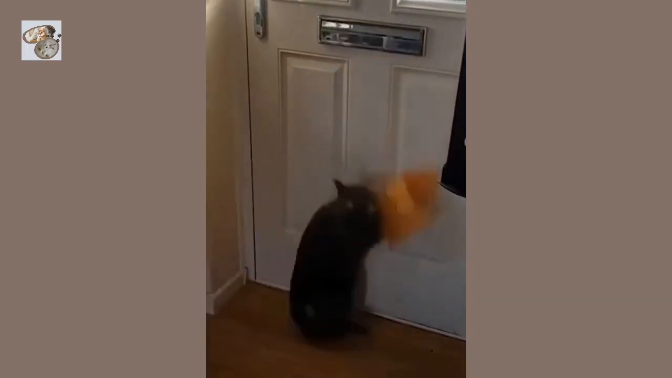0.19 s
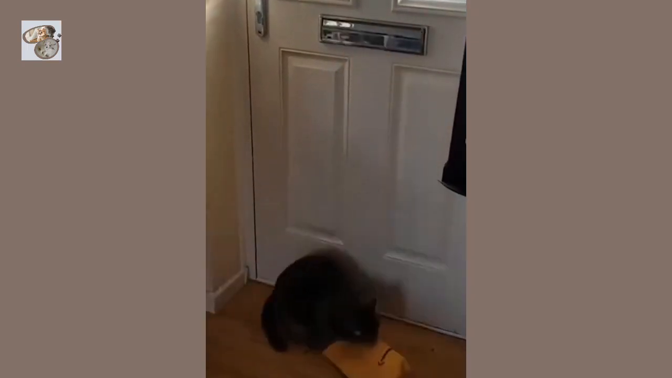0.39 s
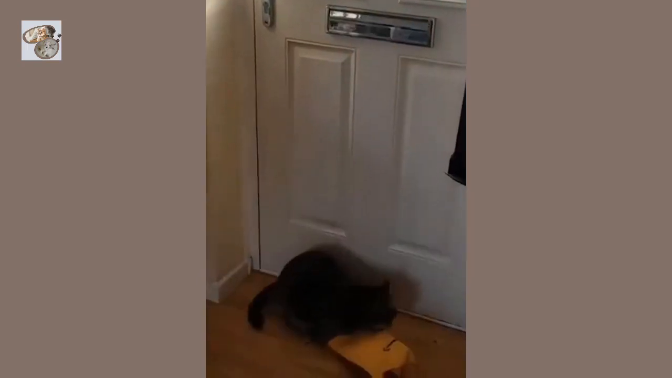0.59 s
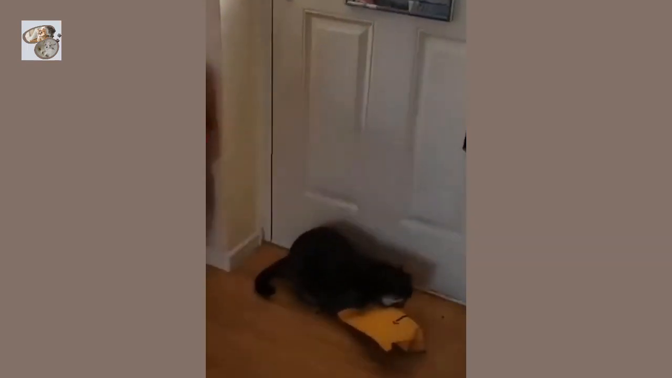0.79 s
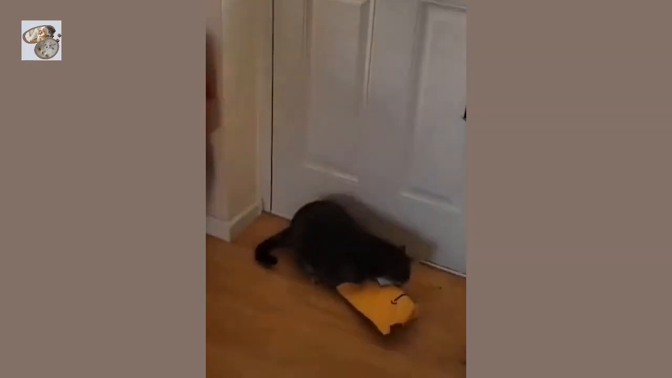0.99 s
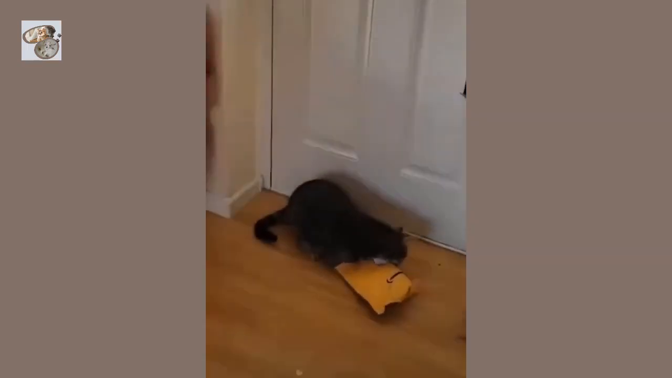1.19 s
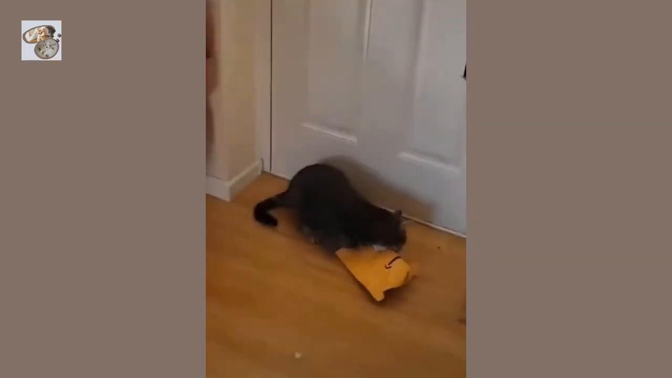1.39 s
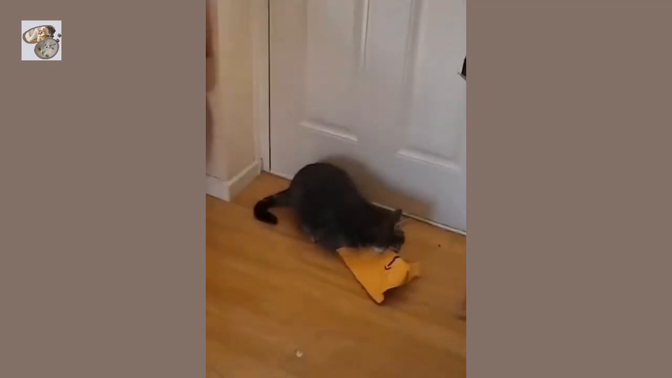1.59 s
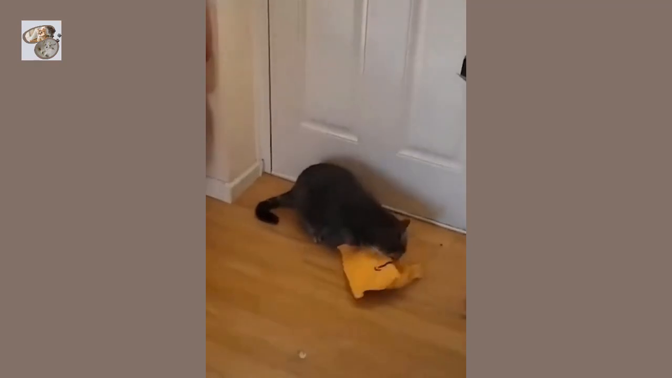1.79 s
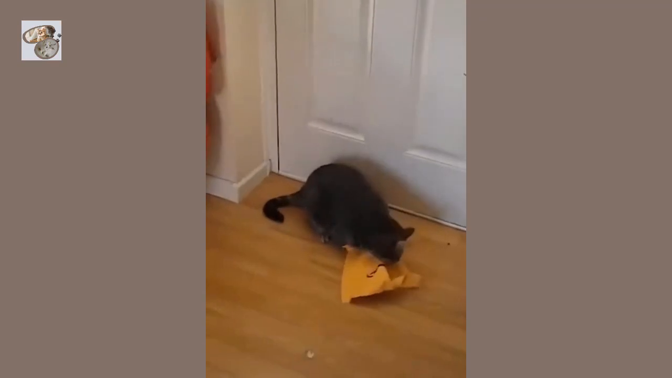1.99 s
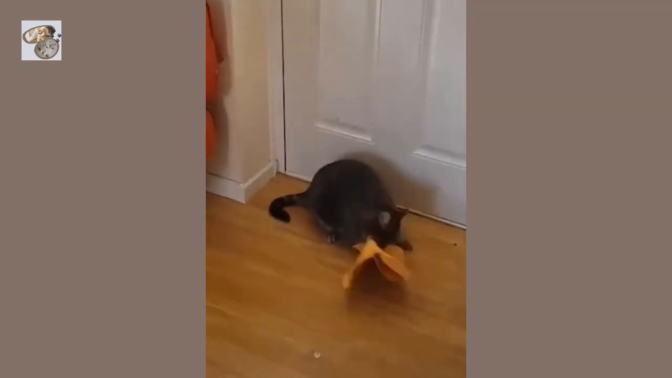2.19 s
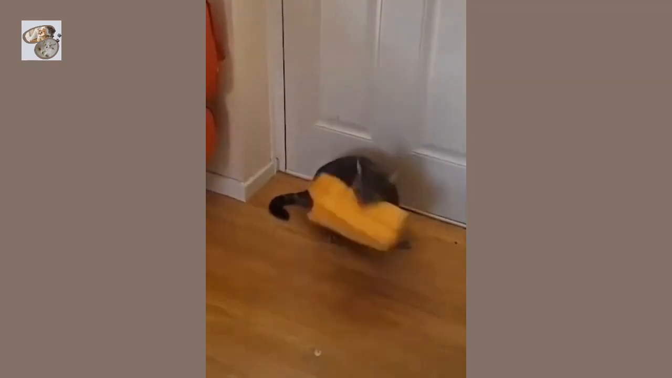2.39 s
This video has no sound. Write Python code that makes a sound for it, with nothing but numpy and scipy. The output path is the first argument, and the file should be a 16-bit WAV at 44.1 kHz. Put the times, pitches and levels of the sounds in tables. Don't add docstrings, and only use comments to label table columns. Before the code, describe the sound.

Padded envelope scrapes from a ringing metal flap, drops with thuds and slaps, then rustles faintly

```python
import sys
import numpy as np
from scipy import signal
from scipy.fft import rfft, irfft
from scipy.io import wavfile
from scipy.ndimage import uniform_filter1d

SR = 44100
rng = np.random.default_rng(int(sys.argv[2]) if len(sys.argv) > 2 else 0)


def file_out(sig):
    cols = np.atleast_2d(sig).T
    lim = np.clip(cols, -1, 1)
    pcm = np.round(lim * 32767).astype(np.int16)
    wavfile.write(sys.argv[1], SR, pcm)


def how_loud(loudness_db):
    steps = np.asarray(loudness_db, float) / 20
    return 10 ** steps


N = 105840

# (frequency [Hz], level [dB])
AIR_COLOUR = [(12, -54), (20, 2.5), (161, -1), (346, -23), (4550, -16.5), (5820, -13.5), (7250, -29),
              (12900, -27.5), (14000, -50)]
AIR_DB = -60

# (frequency [Hz], t60 [s])
HALL_DECAY = [(150, 0.4), (400, 0.37), (1040, 0.4), (2760, 0.48), (7280, 0.32), (12000, 0.27)]
THUD_HALL_DB, LOUD_HALL_DB, PAPER_HALL_DB, CREASE_HALL_DB = -8, -2, -4, -9

# (frequency [Hz], side level [dB])
STEREO_WIDTH = [(100, -34.5), (210, -17.5), (330, -7), (680, -6.5), (1240, 0), (2270, -3.5), (9000, -2),
                (12000, -1)]
LEAN = -0.08
DIP_HZ, DIP_WIDTH_HZ, DIP_DB, EDGE_HZ = 8150, 450, -10, 12950

# (time [s], peak level [dB],
# pitch [Hz], length [cycles])
THUDS = [(0.246, -35, 61, 2.6), (.283, -23, 230, 3.4), (.302, -20.5, 74.6, 1.3), (.347, -26.5, 67.6, 1.5),
         (.375, -34, 62, 4.6), (.432, -16.5, 155, 1.6), (.448, -11, 210, 3.3), (0.46, -15.5, 66, 1.64),
         (.467, -8.5, 200, 2.58), (.478, -24, 87, 4.7), (.49, -21.5, 153, 6), (.505, -20.5, 236, 1.9),
         (0.521, -35, 61, 11), (.521, -23.5, 140, 1.6), (.541, -26.5, 145, 1.6), (.57, -35.5, 95, 3),
         (.704, -25, 243, 1.45), (.712, -26, 310, 1.9), (.72, -47.5, 58, 6.8), (.7405, -12.5, 484, 0.81),
         (1.1745, -36, 580, 3.5), (1.2955, -43, 610, 3.5), (1.59, -56, 70, 2.3), (1.683, -34, 259, 2),
         (1.685, -38, 730, 1.8), (1.888, -28, 293, 1.57), (2.092, -45.5, 139, 0.75), (2.26, -40.5, 930, 5)]
# (frequency [Hz], level [dB], t60 [s])
BOARDS = [(65, -20.5, 0.16), (160, -14, 0.21), (210, -9, 0.13), (338, -31, .25), (768, 6, 0.062)]
BOARDS_DB = -21

# (time [s], pitch [Hz], level [dB])
GROWL = [
    (1.42, 229.8, -89),
    (1.5, 225, -59),
    (1.58, 171.7, -56.5),
    (1.66, 212.3, -63),
    (1.78, 181.8, -71),
    (1.86, 169.2, -48.5),
    (2.0, 180.5, -61.5),
    (2.15, 168.3, -72),
]

# (time [s], peak level [dB], lowest [Hz], highest [Hz])
TICKS = [
    (.7402, -12, 400, 5000),
    (.7695, -19, 1500, 4500),
    (1.3605, -26, 500, 4000),
    (1.4855, -26, 1400, 15000),
    (1.5055, -34, 2500, 15000),
    (1.6138, -26, 4100, 15000),
    (1.6852, -31, 300, 2500),
    (1.8425, -33, 800, 4000),
]

# (time [s], peak level [dB], pitch [Hz], length [s])
CREASES = [(0.159, -50, 5340, 0.0036), (.173, -41, 4300, 0.0053), (0.1736, -38, 5870, 0.0054),
           (0.176, -48, 1250, 0.0058), (0.183, -42, 904, 0.0092), (.2105, -30.5, 4640, 0.015),
           (.213, -27.5, 2550, 0.013), (0.222, -26.5, 4220, .007), (0.23, -27, 893, 0.0091),
           (0.241, -26, 1294, 0.012), (0.269, -36, 3007, .018), (0.277, -38, 1443, 0.013),
           (0.3188, -25, 1476, 0.01), (0.351, -30, 1300, 0.0065), (0.439, -23.5, 710.4, 0.021),
           (0.461, -29, 718, 0.018), (.465, -30, 900, 0.012), (.469, -23.5, 1211, 0.014),
           (.47, -27, 1999, .016), (.472, -21.5, 342, 0.016), (.505, -36, 602, 0.034),
           (.51, -33.5, 1128, 0.015), (0.736, -30.5, 4840, 0.021), (0.738, -22, 3386, .007),
           (0.749, -30.5, 5990, 0.016), (.764, -28, 2230, 0.013), (0.781, -31.5, 2813, 0.019),
           (1.171, -46.5, 2670, 0.0025), (1.205, -43, 3225, 0.011), (1.206, -40.5, 2007, 0.0075),
           (1.289, -41, 4060, .005), (1.336, -47.5, 746, 0.0093), (1.36, -39, 1390, 0.0031),
           (1.369, -42, 1006, .008), (1.391, -44.5, 1010, 0.0044), (1.69, -49, 753, 0.039),
           (1.716, -48.5, 480, 0.033), (2.223, -44.5, 2826, .015), (2.245, -49.5, 3940, .01),
           (2.261, -44, 1826, 0.0051), (2.268, -41, 962, 0.011), (2.341, -47, 3910, 0.013)]
CREASE_ROUGHNESS = 0.8
# (time [s], length [s], level [dB], from [Hz], to [Hz])
SQUEEZES = [
    (.24, .06, -36, 1505, 4283),
    (0.319, .045, -29, 1506, 3196),
]
SQUEEZE_WIDTH_HZ = 500

# (time [s], level [dB], t60 [s], dullness [dB per octave], plastic sheen [dB])
SLAPS = [(0.174, -35, 0.073, -15, -13), (0.188, -27.5, 0.06, -8, 4.5), (.436, -21, 0.28, 4.5, 11),
         (.442, -21, 0.084, 1.5, 27.5), (0.455, -20.5, 0.091, -25.5, -11), (.47, -21.5, 0.068, 4.5, 0),
         (.54, -39.5, 0.16, -12, -21), (0.7331, -29, 0.071, 2.5, 7), (.74, -21, 0.12, -0.5, 2.5),
         (.757, -27.5, 0.16, 8, 17), (1.166, -46, 0.17, -3, 3.5), (1.205, -36.5, 0.043, 0.5, -20),
         (1.292, -45.5, 0.2, -15, -10), (1.36, -34.5, 0.055, 3.5, -12), (1.685, -35.5, 0.048, 6.5, 5),
         (1.69, -39.5, 0.031, -4.5, -9), (1.841, -35.5, 0.065, 2.5, -8), (1.891, -30, 0.052, 2, -1),
         (2.258, -37, 0.083, 4.5, 0)]
# (frequency [Hz], level [dB])
SLAP_COLOUR = [(150, -27), (250, -9), (978, -8.5), (4930, -7), (5450, -10), (5930, -9.5), (8310, -24.5),
               (12400, -26), (14000, -45)]
SLAP_RISE_S, SHEEN_HZ = 0.0015, 8290

# (time of top [s], level [dB], rise and fall [s], dullness [dB per octave], plastic sheen [dB])
RUSTLES = [(0.654, -47, 0.09, -2.5, -0.5), (0.949, -55, 0.11, 8, 15), (1.058, -55, 0.013, -8.5, -5.5),
           (1.238, -44.5, 0.031, -1.5, -1), (1.291, -46.5, 0.01, 0.5, 8), (1.338, -52, 0.033, 4, 14),
           (1.387, -48.5, 0.036, 1, 2), (1.497, -50, 0.025, 1, 4), (1.572, -55, 0.086, 2, 10.5),
           (1.74, -54.5, 0.04, 4, 2), (1.818, -49.5, 0.039, -3, -7), (1.873, -42.5, 0.018, 1, -3),
           (1.94, -53.5, 0.049, 10, 32), (2.09, -50, 0.035, -4.5, -6.5), (2.162, -49.5, 0.035, -5.5, -5),
           (2.231, -43, 0.03, -1.5, 5), (2.276, -45, 0.027, 2.5, 11.5), (2.348, -40.5, 0.037, -4, 1.5),
           (2.4, -65, 0.022, -6, 0)]
# (frequency [Hz], level [dB])
PAPER_COLOUR = [(180, -22.5), (300, -11), (986, -5), (1320, -3), (4470, -2), (8100, -19), (12500, -20),
                (13300, -25), (14000, -76)]

# (time [s], force [dB])
PULL = [
    (.155, -62.5),
    (.18, -50),
    (.205, -31.5),
    (.217, -29.5),
    (.25, -29.5),
    (.3, -32),
    (.355, -35.5),
    (.368, -46),
    (.43, -32.5),
]
# (frequency [Hz], level [dB])
PULL_COLOUR = [(150, -40), (250, -19), (394, -21.5), (841, -15), (1010, -18), (4380, -16), (8310, -25),
               (12200, -25), (14000, -43)]
# (frequency [Hz], bandwidth [Hz], level [dB])
FLAP = [(860, 45, 3), (1220, 110, -7), (2980, 140, -9), (4420, 60, -9)]
FLAP_DB, FLAP_S, FLAP_SPAN_S = 2, 0.245, 0.04
RATTLE_HZ, RATTLE_DB = 75, -16


def evened(x):
    return x / np.sqrt(np.mean(x ** 2) + 1e-20)


def read(points, hz):
    f, value = np.transpose(points)
    return np.interp(np.log(hz + 1), np.log(f + 1), value)


def curve(rows, col=1):
    rows = np.array(rows)
    return np.interp(np.arange(N) / SR, rows[:, 0], rows[:, col])


def add(mix, s, sound):
    part = mix[round(s * SR):][:len(sound)]
    part += sound[:len(part)]


def colour(x, points, slope_db=0., sheen_db=0.):
    hz = np.fft.rfftfreq(len(x) if x.ndim == 1 else len(x), 1 / SR)
    shelf = sheen_db * np.clip((hz - SHEEN_HZ) / 1000 + 0.5, 0, 1)
    tilt = slope_db * np.log2(hz / 2000 + 0.15)
    return irfft(rfft(x) * how_loud(read(points, hz) - tilt + shelf), len(x))


def ring(x, hz, width):
    r = np.exp(-np.pi * width / SR)
    return 2 * signal.lfilter([1 - r], [1, -r * np.exp(2j * np.pi * hz / SR)], x).real


def crackle(per_s, spread_db, clump_db):
    out, t = np.zeros(N), np.arange(256) / SR
    for hz in np.geomspace(300, 14000, num=12):
        clumps = uniform_filter1d(rng.standard_normal(N), size=400)
        clumps = evened(uniform_filter1d(clumps, size=400))
        size_db = spread_db * np.minimum(rng.exponential(1, N), 3) + clump_db * clumps
        size = how_loud(size_db) * rng.standard_normal(N)
        hits = size * (rng.random(N) < per_s / SR)
        snap = np.sin(2 * np.pi * hz * t) * np.exp(-t * hz * 2.08)
        out += signal.oaconvolve(hits, snap * np.sqrt(hz) / np.linalg.norm(snap))[:N]
    return evened(out)


def air():
    noise = rng.standard_normal((2, N))
    return how_loud(AIR_DB) * evened(np.array([colour(v, AIR_COLOUR) for v in noise]))


def hall(x):
    taps = np.zeros((3, 2, SR))
    at = np.arange(120, SR - 20, 20) + rng.integers(0, 20, (3, 2, (SR - 121) // 20))
    np.put_along_axis(taps, at, rng.choice([-1., 1.], at.shape), 2)
    hz, t, z = signal.stft(taps, SR, nperseg=256)
    t60 = np.maximum(read(HALL_DECAY, hz), 0.05)[:, None]
    tail = signal.istft(z * how_loud(-60 * t / t60), SR, nperseg=256)[1]
    phase = np.arange(N) / SR * 7 + np.arange(3)[:, None, None] / 3
    turns = np.sqrt(2 / 3) * np.cos(2 * np.pi * phase)
    return signal.fftconvolve(x * turns, tail / np.linalg.norm(tail[0, 0]), axes=2)[..., :N].sum(0)


def thuds():
    blows = np.zeros(N)
    for s, db, hz, cycles in THUDS:
        u = np.arange(0, 1.5 * cycles, hz / SR)
        swell = np.e * 3 * u / cycles * np.exp(-3 * u / cycles)
        add(blows, s, how_loud(db) * np.sin(2 * np.pi * u) * swell)
    boards = sum(how_loud(db) * ring(blows, hz, 2.9 / t60) * 8 for hz, db, t60 in BOARDS)
    return blows + how_loud(BOARDS_DB) * boards


def growl():
    wobble = evened(uniform_filter1d(rng.standard_normal((2, N)), size=700))
    turns = np.cumsum(curve(GROWL) * (1 + 0.08 * wobble[0])) / SR
    tone = np.sin(2 * np.pi * turns) + 0.69 * np.sin(4 * np.pi * turns * 0.8)
    return evened(tone) * how_loud(curve(GROWL, col=2) + 1.7 * wobble[1])


def ticks():
    out, t = np.zeros(N), np.arange(400) / SR
    for (s, db, low_hz, top_hz), noise in zip(TICKS, rng.standard_normal((len(TICKS), 400))):
        high_pass = signal.butter(4, low_hz, "high", fs=SR, output="sos")
        low_pass = signal.butter(2, top_hz, fs=SR, output="sos")
        click = signal.sosfilt(high_pass, noise * how_loud(-60 * t / 0.006))
        click = signal.sosfilt(low_pass, 0.15 * click + ring(click, 3500, 4000))
        add(out, s, how_loud(db) * click / np.abs(click).max())
    return out


def creases():
    out = np.zeros(N)
    for (s, db, hz, length), noise in zip(CREASES, rng.standard_normal((len(CREASES), 2, 8192))):
        u = np.arange(8192) / SR / length
        flutter = 1 + CREASE_ROUGHNESS * evened(uniform_filter1d(noise, size=90))
        turn = 2 * np.pi * hz * length * u
        tone = flutter[0] * np.sin(turn) + (flutter[1] - 1) * np.cos(turn)
        add(out, s, how_loud(db) * tone * np.e * 3 * u * np.exp(-3 * u))
    return out


def squeezes():
    out = np.zeros(N)
    for s, length, db, from_hz, to_hz in SQUEEZES:
        u = np.arange(0, 1, 1 / (length * SR))
        turn = np.exp(2j * np.pi * np.cumsum(from_hz * (to_hz / from_hz) ** u) / SR)
        real, imag = [ring(v, 0, SQUEEZE_WIDTH_HZ)[:len(u)] for v in rng.standard_normal((2, 8192))]
        hiss = evened((turn * (real + 1j * imag)).real)
        add(out, s, how_loud(db) * hiss * np.sqrt(np.sin(np.pi * u)))
    return out


def slaps():
    out, t = np.zeros(N), np.arange(8192) / SR
    for (s, db, t60, slope_db, sheen_db), noise in zip(SLAPS, rng.standard_normal((len(SLAPS), 2, 8192))):
        grains = noise[0] * (5.1 + np.abs(noise[1]))
        grains = evened(colour(grains, SLAP_COLOUR, slope_db, sheen_db))
        add(out, s, grains * np.minimum(t / SLAP_RISE_S, 1) * how_loud(db - 60 * t / t60))
    return out


def worry():
    snaps, t = crackle(3500, spread_db=1.0, clump_db=0.4), np.arange(N) / SR
    out = np.zeros(N)
    for s, db, span, slope_db, sheen_db in RUSTLES:
        rustle = evened(colour(snaps, PAPER_COLOUR, slope_db, sheen_db))
        out += rustle * how_loud(db) * np.exp(-((t - s) / span) ** 2)
    return out


def pull():
    t = np.arange(N) / SR
    force = how_loud(curve(PULL)) * (t > PULL[0][0]) * (t < PULL[-1][0])
    slips = evened(colour(crackle(3000, spread_db=3.5, clump_db=6.0), PULL_COLOUR))
    contact = 0.27 + np.exp(-((t - FLAP_S) / FLAP_SPAN_S) ** 2)
    scrape = rng.standard_normal(N) * force * contact
    metal = sum(how_loud(db) * ring(scrape, hz, width) * np.sqrt(1000 / width) for hz, width, db in FLAP)
    door = evened(ring(ring(rng.standard_normal(N), RATTLE_HZ, 85), RATTLE_HZ, 84))
    return force * (slips + how_loud(RATTLE_DB) * door) + how_loud(FLAP_DB) * metal


def scene():
    low, near = thuds() + growl(), ticks()
    loud, paper, pops = pull() + slaps(), worry(), creases() + squeezes()
    bright = loud + paper + pops
    to_hall = how_loud(THUD_HALL_DB) * low + how_loud(LOUD_HALL_DB) * loud
    to_hall += how_loud(PAPER_HALL_DB) * paper + how_loud(CREASE_HALL_DB) * pops
    mid, side = hall(to_hall) + air()
    mid = mid + low + 0.8 * bright + near
    late = np.roll(0.14 * bright + 0.15 * near, 9)
    side = colour(side + late + LEAN * mid, STEREO_WIDTH) * how_loud(3.0)
    return np.array([mid + side, mid - side])


def roll_off(x):
    return signal.sosfilt(signal.butter(12, 14540, fs=SR, output="sos"), x)


def record(dry):
    hz = np.fft.rfftfreq(N, 1 / SR)
    dip_db = DIP_DB * np.exp(-((hz - DIP_HZ) / DIP_WIDTH_HZ) ** 2)
    edge_db = -0.019 * np.maximum(hz - EDGE_HZ, 0)
    bass_cut = hz ** 2 / (hz ** 2 + 32 ** 2)
    mix = irfft(rfft(dry) * how_loud(dip_db + edge_db) * bass_cut, N)
    return roll_off(mix)


dry = scene()
out = record(dry)
file_out(out)
```